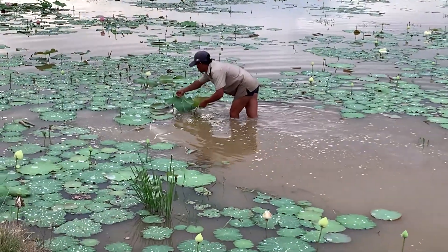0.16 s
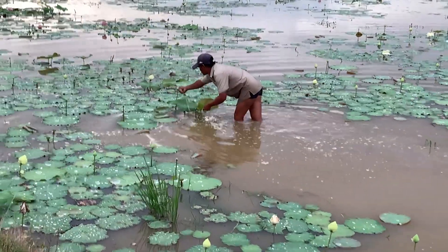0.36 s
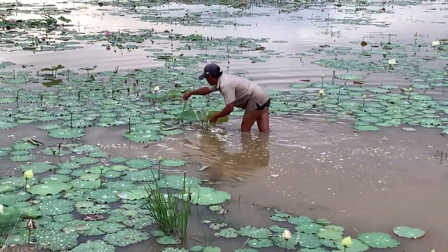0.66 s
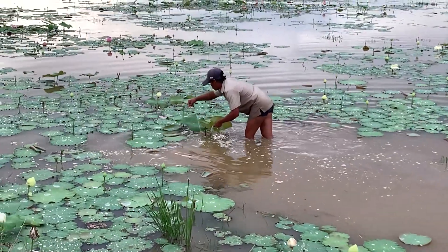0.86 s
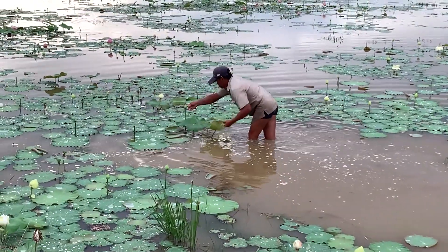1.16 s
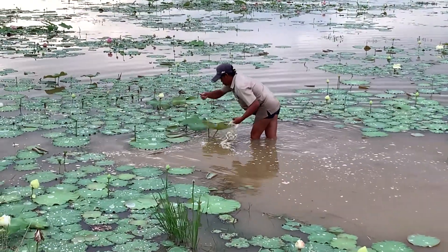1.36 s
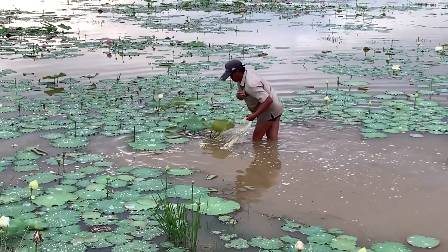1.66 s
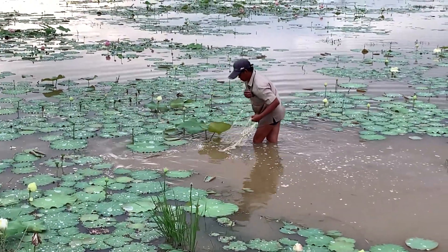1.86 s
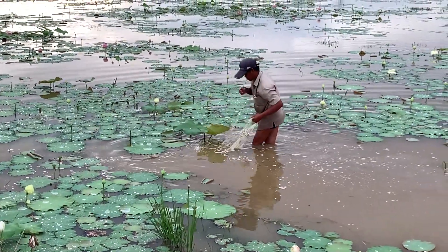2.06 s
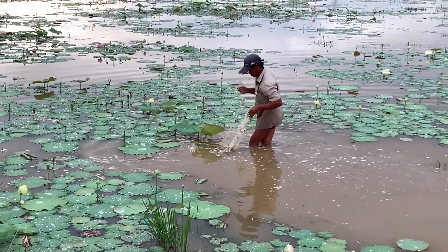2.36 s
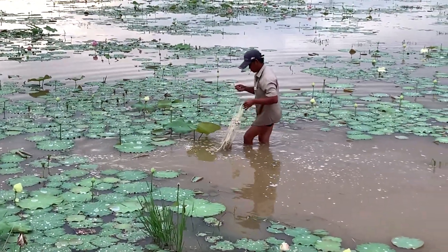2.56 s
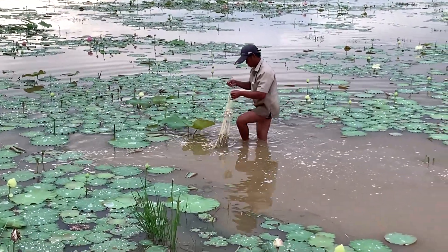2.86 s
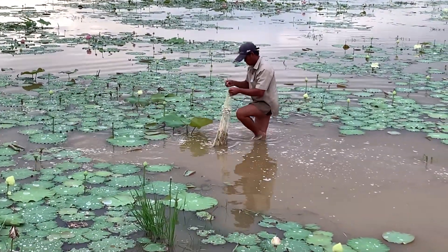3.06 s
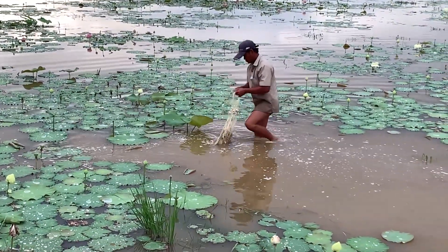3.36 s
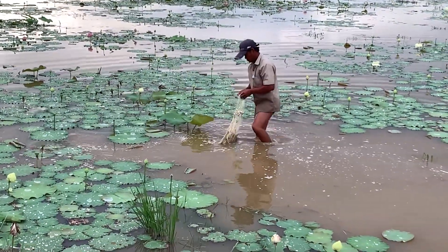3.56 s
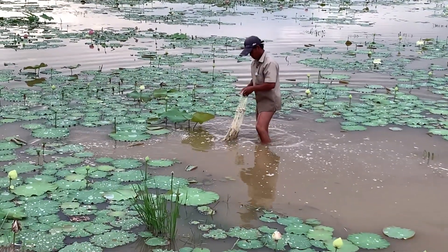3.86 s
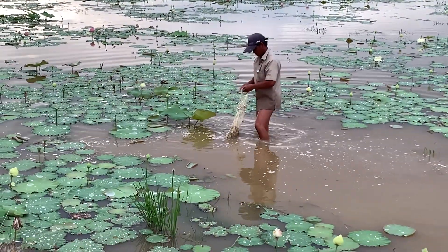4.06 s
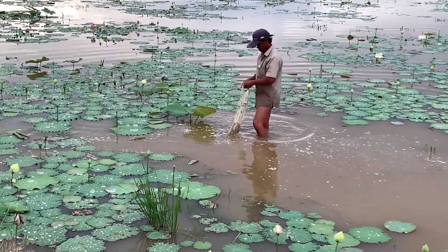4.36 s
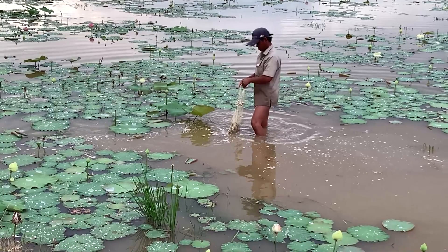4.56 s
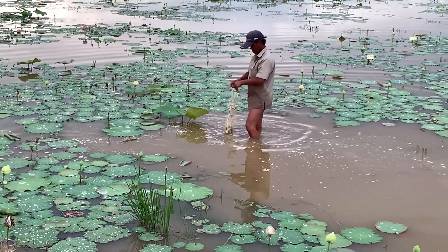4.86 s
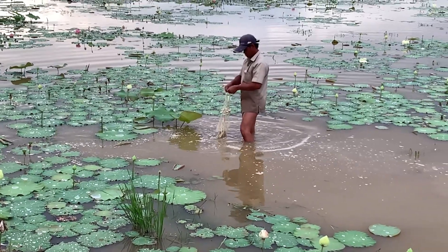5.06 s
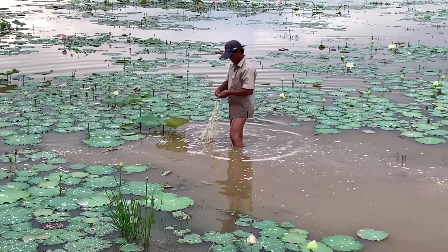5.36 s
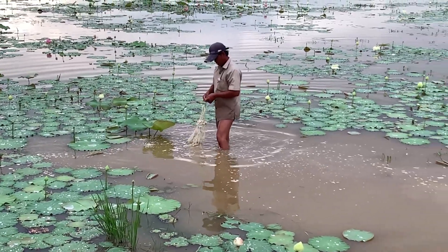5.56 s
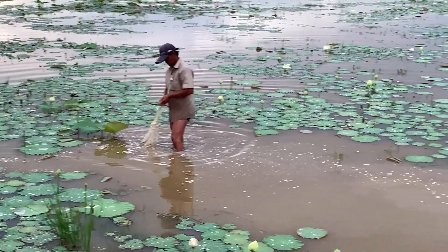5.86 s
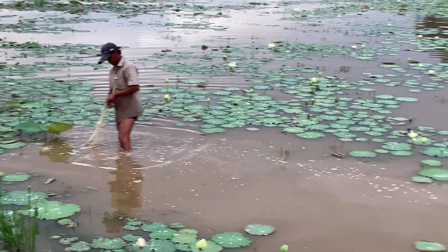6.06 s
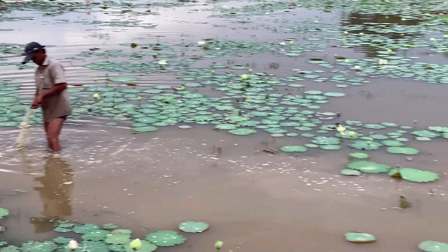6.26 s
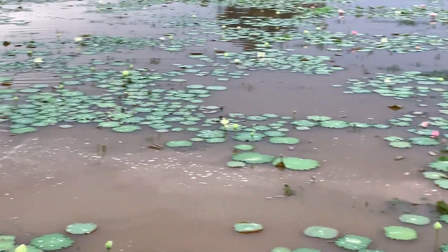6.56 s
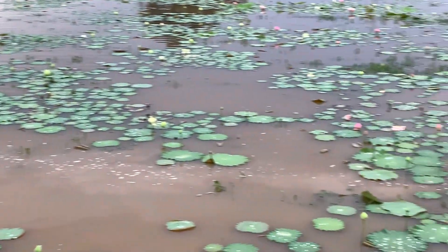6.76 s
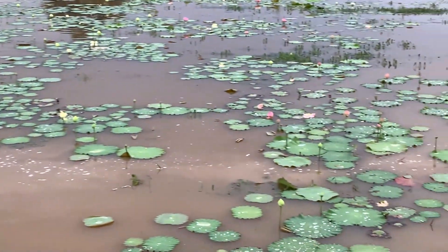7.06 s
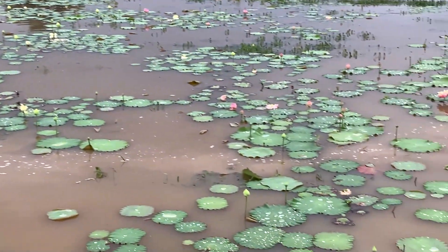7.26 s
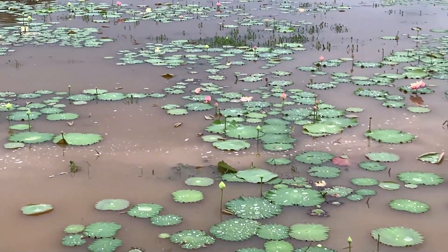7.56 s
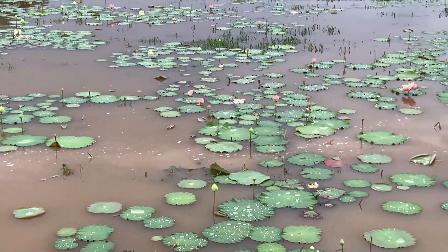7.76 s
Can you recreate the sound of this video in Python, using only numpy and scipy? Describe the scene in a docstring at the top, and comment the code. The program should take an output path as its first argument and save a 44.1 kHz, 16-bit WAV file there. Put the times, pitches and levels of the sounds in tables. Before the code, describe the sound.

Outdoors on a pond, dense nasal bird chatter runs without pause while water pours and plops softly, low air rumbles, and handling thuds knock occasionally.

```python
"""Lotus pond: a colony of birds chatters off to the left in short, buzzy, overlapping calls, with thin chips between.
Calls are pulsed harmonics through a throat resonance plus puffs of noise; chips are bent tones with overtones.
A man wades and gathers a wet net some way off: rising bubbles, splashes and a wash of coloured noise.
Noise makes the low rumble, open-air murmur and high left hiss; wavering tones make the faint far hums.
The camera is bumped a few times: decaying modes and a noise scuff."""
import sys
import numpy as np
from scipy import signal
from scipy.fft import rfft, irfft, next_fast_len
from scipy.io import wavfile
from scipy.ndimage import map_coordinates

SR = 44100
rng = np.random.default_rng(int(sys.argv[2]) if len(sys.argv) > 2 else 0)


def inscribe(sig):
    """Save sig as 16-bit PCM at rate SR to the path in sys.argv[1].

    A 1-D sig is mono; a 2-D sig holds one channel per row.
    Samples are clipped to [-1, 1] before scaling.
    """
    pcm = np.round(np.clip(np.atleast_2d(sig).T, -1, 1) * 32767)
    wavfile.write(sys.argv[1], SR, pcm.astype(np.int16))


N = 348823


def amp(db):
    """Decibels to gain."""
    return 10 ** (np.asarray(db) / 20)


def unit(x):
    """Scale to rms 1."""
    return x / np.sqrt(np.mean(x ** 2) + 1e-20)


def along(points, hz):
    """Read (frequency, value) points on a log frequency axis."""
    f, v = np.transpose(points)
    return np.interp(np.log(hz + 1e-6), np.log(f), v)


def curve(rows):
    """Interpolate (time_s, value) rows to one value per sample."""
    s, values = np.transpose(rows)
    return np.interp(np.arange(N) / SR, s, values)


def wobble(rate_hz, size=N):
    """Smooth random curve with rate_hz knots a second."""
    knots = rng.standard_normal(int(size * rate_hz / SR) + 4)
    return map_coordinates(knots, [np.arange(size) * rate_hz / SR], mode="mirror")


def filtered(x, response):
    """Multiply the spectrum of x by a (complex) response of frequency."""
    m = next_fast_len(x.shape[-1] + 4096)
    spectrum = rfft(x, m) * response(np.fft.rfftfreq(m, 1 / SR))
    return irfft(spectrum, m)[..., :x.shape[-1]]


def add(track, start_s, sound):
    """Mix a sound into the track at start_s."""
    room = track[max(0, round(start_s * SR)):][:len(sound)]
    room += sound[:len(room)]


def rush(spectrum, side_db):
    """Coloured stereo noise of rms 1; the side part sets its width."""
    mid, side = filtered(rng.standard_normal((2, N)), lambda hz: amp(along(spectrum, hz)))
    side = amp(side_db) * side
    return unit(np.array([mid + side, mid - side]))


def from_left(x, lead_ms):
    """Sound from the left reaches the left port lead_ms before the right."""
    return filtered(x, lambda hz: np.exp(np.outer([1, -1], 1j * np.pi * hz * lead_ms / 1e3)))


def arch(u, start, middle, end):
    """Parabola through three values as u goes from 0 to 1."""
    return start * (1 - u) * (1 - 2 * u) + 4 * middle * u * (1 - u) + end * u * (2 * u - 1)


def gate(t, attack_s, release_s):
    """Linear opening and closing ramps."""
    return np.clip(t / attack_s, 0, 1) * np.clip((t[-1] - t) / release_s, 0, 1)


def swell(crest_s, width_s, db):
    """Bell of power that rises and settles."""
    return amp(db) ** 2 * np.exp(-((np.arange(N) / SR - crest_s) / width_s) ** 2)


# rumble, murmur and hiss colours: hz, relative level_db_per_hz
RUMBLE_COLOUR = [(20, -49), (35, -15.5), (52, -1.5), (70, 5.5), (110, 0.5), (160, -13), (220, -20.5),
                 (400, -63.5)]
MURMUR_COLOUR = [(120, -24), (250, 6.5), (400, 5.5), (550, -1.5), (850, -4), (1200, -16), (3000, -18.5),
                 (5000, -26.5), (7000, -51), (12000, -35)]
HISS_COLOUR = [(7000, -68), (7850, -3), (8100, 23.5), (9000, 22), (9650, 16), (10200, -5.5), (12000, -14)]
# murmur and hiss levels before trim: time_s, level_db
MURMUR_LEVEL = [(0, -63), (1.7, -65), (6.2, -63.5), (6.5, -59.5), (7.91, -61.5)]
HISS_LEVEL = [(0, -75.5), (6.1, -80), (7.91, -67)]
# swells of the rumble: crest_s, half_width_s, level_db
GUSTS = [(2.7, 0.44, -46), (5.2, 0.28, -47.5), (7.2, 0.555, -46.5)]
RUMBLE_DB, RUMBLE_WANDER_DB = -43.5, 0.25  # level between gusts, slow drift


def air(murmur_trim_db=2, hiss_trim_db=4):
    """Gust-swelled low rumble, open-country murmur and shimmering high hiss on the left, all coloured noise."""
    calm_db = RUMBLE_DB + RUMBLE_WANDER_DB * wobble(3.02)
    rumble_gain = np.sqrt(amp(calm_db) ** 2 + sum(swell(*row) for row in GUSTS))
    murmur_db = curve(MURMUR_LEVEL) + murmur_trim_db + wobble(5)
    shimmer_db = 1.02 * wobble(140) + 0.91 * wobble(14)
    hiss_db = curve(HISS_LEVEL) + hiss_trim_db + shimmer_db
    # last factor: left and right gains, dB
    rumble = rumble_gain * rush(RUMBLE_COLOUR, side_db=-13.5) * amp([[.8], [-.8]])
    murmur = amp(murmur_db) * rush(MURMUR_COLOUR, side_db=-5.5) * amp([[.5], [-.5]])
    hiss = amp(hiss_db) * rush(HISS_COLOUR, side_db=-5) * amp([[2], [-17]])
    return rumble + murmur + hiss


def hum(length_s, start_hz, end_hz, waver, fading_db):
    """Far tone that swells, wavers and fades; the moving air smears its phase."""
    t = np.arange(int(length_s * SR)) / SR
    pitch_hz = np.linspace(start_hz, end_hz, len(t)) * (1 + waver * wobble(24.9, len(t)))
    smear_rad = .85 * wobble(60, len(t))
    tone = np.sin(2 * np.pi * np.cumsum(pitch_hz) / SR + smear_rad)
    tone = tone * amp(fading_db * wobble(18.1, len(t)))
    return unit(tone * np.sqrt(np.abs(np.sin(np.pi * t / t[-1]))))


# far wavering hums: start_s, length_s, level_db before trim, start_hz, end_hz
HUMS = [(1.05, 0.52, -69, 730, 721), (1.797, 2.5, -67, 672, 687), (3.1, 0.49, -69, 614, 609.6),
        (5.25, 1.27, -67.5, 738, 763), (5.9, 2.01, -68, 919, 914), (6.4, 0.634, -69, 816, 825.3),
        (7.62, 0.32, -62.5, 663.8, 610)]
# short low far hoots: start_s, length_s, level_db before trim, pitch_hz
HOOTS = [(0.071, 0.25, -61.5, 410), (2.529, 0.26, -62.5, 388), (4.699, .17, -62.5, 382),
         (6.239, 0.17, -60.5, 380), (6.83, .14, -58, 380), (7.299, 0.114, -57.5, 392)]


def hums(trim_db=-2):
    """Faint hums and short low hoots from far away, each a wavering sine."""
    out = np.zeros(N)
    for start_s, length_s, level_db, start_hz, end_hz in HUMS:
        sound = hum(length_s, start_hz, end_hz, waver=0.00803, fading_db=4)
        add(out, start_s, amp(level_db + trim_db) * sound)
    for start_s, length_s, level_db, pitch_hz in HOOTS:
        sound = hum(length_s, pitch_hz, pitch_hz, waver=0.017, fading_db=2.5)
        add(out, start_s, amp(level_db + trim_db) * sound)
    return out


# decay of the scattered tail: hz, t60_s
BANK_DECAY = [(300, 0.123), (3000, 0.098), (10000, 0.0271)]


def banks(x):
    """Banks and plants scatter a short diffuse tail: noise that decays by frequency, convolved with x."""
    hz, t, z = signal.stft(rng.standard_normal((2, SR // 3)), SR, nperseg=256)
    decay = amp(-60 * t / along(BANK_DECAY, hz)[:, None])
    tail = signal.istft(z * decay, SR, nperseg=256)[1]
    return signal.fftconvolve(x[None], tail / np.linalg.norm(tail[0]), axes=1)[:, :N]


def bubble(hz, cycles, rise=0.76):
    """An air bubble rings briefly; its pitch climbs by the share rise."""
    t = np.arange(int(cycles / hz * SR)) / SR
    u = t / t[-1]
    return np.sin(2 * np.pi * hz * t * (1 + rise * u / 2)) * amp(-40 * u) * (1 - np.exp(-t * hz))


# water falling from the net and round the legs: start_s, level_db before trims, bubble start_hz
PLOPS = [(.7, -45, 920), (1.074, -44, 910), (3.306, -46.5, 726), (3.415, -46.5, 873), (3.555, -48, 750),
         (6.436, -42, 800)]
# splash and wash colours: hz, relative level_db_per_hz
SPLASH_COLOUR = [(400, -24), (800, 11), (1600, -12.5), (3000, -17), (5000, -43), (9000, -61)]
TRICKLE_COLOUR = [(500, 10), (1000, 6), (1600, 15.5), (3300, 5), (5000, -12.5), (9000, -39)]
# stirred water: crest_s, half_width_s, level_db before trims
SWASHES = [(.24, 0.315, -55.5), (3.1, 0.6, -61), (6.6, 0.18, -54), (7.55, 0.41, -54.5)]
TRICKLE_DB = -67  # calm water, before trims


def water(drop_count=1100, drop_hz=1900, drop_db=-3, wash_db=-6.5, spatter_db=4.0,
          plop_db=-4, splash_db=-9, splash_t60_s=0.13):
    """Each plop is a bubble and a brief noise splash; small bubbles and a soft wash swell beneath."""
    trickle_db = 10 * np.log10(amp(TRICKLE_DB) ** 2 + sum(swell(*row) for row in SWASHES))
    plops, splashes, drops = np.zeros((3, N))
    t = np.arange(SR // 8) / SR
    for start_s, level_db, hz in PLOPS:
        add(plops, start_s, amp(level_db + plop_db) * bubble(hz, cycles=20))
        spatter = rng.standard_normal(len(t)) * amp(4 * wobble(300, len(t)))
        splash = unit(filtered(spatter, lambda f: amp(along(SPLASH_COLOUR, f))))
        add(splashes, start_s, amp(level_db + splash_db - 60 * t / splash_t60_s) * splash)
    for when, pitch, size in rng.random((drop_count, 3)):
        octaves = 1.6 * pitch - .8
        drop = amp(13 * size ** 3) * bubble(drop_hz * 2 ** octaves, cycles=9)
        add(drops, when * N / SR, amp(drop_db) * drop)
    wash = amp(trickle_db + wash_db + spatter_db * wobble(110)) * rush(TRICKLE_COLOUR, side_db=2.5)
    return from_left(plops + splashes + amp(trickle_db) * drops, lead_ms=0.28) + wash


# water pouring off the net: start_s, length_s, level_db
POURS = [(0.1, 0.117, -57.5), (0.402, 0.098, -59.5), (0.705, 0.099, -67), (1.008, 0.1236, -54)]
# pour colour: hz, relative level_db_per_hz
POUR_COLOUR = [(300, -22), (600, -1.5), (950, 6.5), (1300, 6.5), (1800, -0.5), (2800, 3.5), (4500, -12.5),
               (9000, -33)]


def pours(rattle_db=2.5):
    """Water pours off the net in rattling bursts: coloured noise of uneven level."""
    out = np.zeros(N)
    for start_s, length_s, level_db in POURS:
        t = np.arange(int(length_s * SR)) / SR
        spatter = rng.standard_normal(len(t)) * amp(rattle_db * wobble(256.5, len(t)))
        burst = unit(filtered(spatter, lambda hz: amp(along(POUR_COLOUR, hz))))
        add(out, start_s, amp(level_db) * burst * gate(t, attack_s=0.0116, release_s=0.018))
    return from_left(out, lead_ms=0.49)


def struck_mode(t, hz, t60_s):
    """A struck resonance: a decaying sine with a softened onset."""
    return amp(-60 * t / t60_s) * np.sin(2 * np.pi * hz * t) * (1 - np.exp(-2 * t * hz))


# dull bumps: start_s (sounds 1.9 ms later), level_db before trims, knock_hz
BUMPS = [(1.258, -37.5, 376), (1.348, -44, 428), (2.7, -38, 168), (5.843, -40.5, 260), (5.882, -45, 289),
         (7.152, -33, 364)]
# scuff colour: frequency over knock_hz, relative level_db_per_hz
SCUFF_COLOUR = [(.16, -16.5), (.36, 5), (.7, 0), (1.25, -2.5), (1.75, -18), (3.2, -61)]


def bumps(knock_db=-3, thud_db=1, scuff_db=-5, mean_thud_hz=110, knock_t60_s=0.059, thud_t60_s=0.32,
          scuff_t60_s=0.11):
    """Handling knocks the camera body: a short knock, a low thud of varying pitch and a dull noise scuff."""
    out, t = np.zeros(N), np.arange(SR // 5) / SR
    for start_s, level_db, knock_hz in BUMPS:
        thud_hz = mean_thud_hz * (1 + 0.08 * rng.standard_normal())
        knock = struck_mode(t, knock_hz, knock_t60_s) + 0.113 * struck_mode(t, 0.5 * knock_hz, knock_t60_s)
        scuff = unit(filtered(rng.standard_normal(len(t)), lambda hz: amp(along(SCUFF_COLOUR, hz / knock_hz))))
        scuff = scuff * amp(scuff_db - 60 * t / scuff_t60_s) * gate(t, attack_s=0.00096, release_s=.01)
        thud = amp(thud_db) * struck_mode(t, thud_hz, thud_t60_s)
        add(out, start_s + 0.0019, amp(level_db) * (amp(knock_db) * knock + scuff + thud))
    return out


# dry snaps: start_s, level_db before trim and filter
TICKS = [(2.622, -40), (6.087, -48)]


def ticks(trim_db=3.5, t60_s=0.0057):
    """A few tiny dry snaps: fast-decaying bright noise."""
    out, t = np.zeros(N), np.arange(SR // 50) / SR
    for start_s, level_db in TICKS:
        add(out, start_s, amp(level_db + trim_db - 60 * t / t60_s) * rng.standard_normal(len(t)))
    return filtered(out, lambda hz: amp(along([(3000, -38.5), (8000, -5.5), (11000, -8)], hz)))


# colour of overtones 3 to 7: hz, level_db
CHIP_COLOUR = [(4000, -31), (5500, 8), (7000, -13), (8400, -6), (10000, -4.5), (12000, -26.5)]


def chip(length_s, start_hz, middle_hz, end_hz, second_db, shrill_db, jitter=0.029):
    """A short rough chip: a bent tone with a ladder of overtones."""
    t = np.arange(int(length_s * SR)) / SR
    pitch_hz = arch(t / t[-1], start_hz, middle_hz, end_hz) * (1 + jitter * wobble(1415, len(t)))
    phase = 2 * np.pi * np.cumsum(pitch_hz) / SR
    k = np.arange(3, 8)[:, None]
    shrill = np.sum(amp(shrill_db + along(CHIP_COLOUR, k * pitch_hz)) * np.sin(k * phase), axis=0)
    tone = np.sin(phase) + amp(second_db) * np.sin(2 * phase) + shrill
    return unit(tone * amp(1.4 * wobble(430, len(t))) * gate(t, attack_s=0.00082, release_s=0.0044))


# thin chips: start_s, length_s, level_db, start_hz, middle_hz, end_hz, second_harmonic_db
CHIPS = [(2.376, 0.00525, -55.5, 1900, 1800, 1900, -20), (4.23, 0.0125, -65.5, 1690, 1780, 1720, -8),
         (5.413, 0.011, -56, 1460, 1570, 1690, 6.5), (5.61, 0.026, -51, 1745, 1300, 1754, 2),
         (5.639, 0.03, -63, 1690, 1710, 1600, 2), (5.718, 0.0432, -56.5, 2930, 2380, 2090, -30)]
CHIP_SHRILL_DB = -31.5
# shrill squeaks: start_s, length_s, level_db, start_hz, middle_hz, end_hz
SQUEAKS = [(0.256, 0.021, -71.5, 1938, 2150, 2040), (2.667, 0.039, -56, 1710, 1634, 1570),
           (2.778, 0.0233, -58.5, 1640, 1874, 1910), (2.798, 0.021, -61.5, 1720, 1594, 1450),
           (6.512, 0.023, -54.5, 1680, 1699, 1740)]
SQUEAK_SECOND_DB, SQUEAK_SHRILL_DB, SQUEAK_JITTER = 2, 2, 0.022


def chips():
    """Thin chips with few shrill overtones, and squeaks rich in them."""
    out = np.zeros(N)
    for start_s, length_s, level_db, *pitches_hz, second_db in CHIPS:
        add(out, start_s, amp(level_db) * chip(length_s, *pitches_hz, second_db, CHIP_SHRILL_DB))
    for start_s, length_s, level_db, *pitches_hz in SQUEAKS:
        sound = chip(length_s, *pitches_hz, SQUEAK_SECOND_DB, SQUEAK_SHRILL_DB, SQUEAK_JITTER)
        add(out, start_s, amp(level_db) * sound)
    return out


def call(length_s, pitches_hz, throat, throat_hz, onset_db, end_db, jitter, rasp_db, shimmer, crest=0.517,
         flutter_db=0.15, body_db=0, waver=0.006, sharpness=5, follow=0.99, scoop=0, settle_s=0.00972,
         quaver=0, quaver_hz=27, hoarsens_db=0, release_s=0.01043):
    """One buzzy call: the syrinx pulses at a bent pitch and rings a throat resonance that bends with it."""
    t = np.arange(int((length_s + 0.0055) * SR)) / SR
    u, size = t / t[-1], len(t)
    bend_hz = arch(u, *pitches_hz)
    mean_hz = bend_hz.mean()
    # the bird tunes its throat halfway to the nearest harmonic
    tuned_hz = mean_hz * round(throat_hz / mean_hz)
    resonance_hz = (throat_hz + tuned_hz) / 2 * (bend_hz / mean_hz) ** follow
    # sharp start that settles, and quaver
    ornament = scoop * np.exp(-t / settle_s) + quaver * np.cos(2 * np.pi * quaver_hz * t)
    pitch_hz = bend_hz * (1 + ornament + waver * wobble(61.0, size) + jitter * wobble(404.9, size))
    phase = 2 * np.pi * np.cumsum(pitch_hz) / SR
    k = np.arange(1, 27)[:, None]
    ratio = k * pitch_hz / (resonance_hz * (1 + 0.36 * ornament))
    # each pulse rings on, so harmonic phase turns through the resonance
    turn = np.arctan(sharpness * (ratio - 1 / ratio))
    partials = amp(along(throat, ratio)) * np.sin(k * phase - turn)
    # random shifting colour per call
    colour = amp([1.4 * rng.standard_normal() + 2 * wobble(55, size) for _ in k])
    body = amp(body_db * np.clip(4 * (1 - ratio), 0, 1))  # weight below the resonance
    voice = unit(np.sum(colour * body * partials, axis=0))
    voice = voice * (1 + shimmer * wobble(500, size))
    # air rasps through in one puff per pulse
    puffs = rng.standard_normal(size) * (1 + np.cos(phase))
    rasp = unit(filtered(puffs, lambda hz: amp(along(throat, hz / throat_hz))))
    rasp = rasp * amp(hoarsens_db * (u - .5))  # above 0 breaks up, below 0 clears
    effort_db = np.interp(u, [0, crest, 1], [onset_db - 7.5, 0, end_db]) + flutter_db * wobble(134, size)
    sound = (voice + amp(rasp_db) * rasp) * amp(effort_db)
    return unit(sound * gate(t, attack_s=.0011, release_s=release_s))


# throat of the colony and of the hoarse near calls: frequency over resonance, level_db
RASP_THROAT = [(.15, -48), (.3, -15.5), (.41, -2), (.55, -4), (.68, -2), (.8, -1.5), (1, 5.5), (1.12, -1.5),
               (1.27, -5.5), (1.5, -21), (1.9, -25.5), (2.6, -31.5), (3.6, -42)]
COLONY_DB, COLONY_SPREAD_DB, COLONY_HZ = -74, 6, 492  # faintest call, range of levels, central pitch


def colony(count=26):
    """The rest of the colony, far off: calls of random pitch and level, one in each equal time slot."""
    out = np.zeros(N)
    for i, (when, size, high, throat) in enumerate(rng.random((count, 4))):
        hz = COLONY_HZ * (.88 + .24 * high)
        voice = call(.06, (hz, hz, .9 * hz), RASP_THROAT, 2900 + 700 * throat, onset_db=2.5, end_db=-3,
                     jitter=.012, rasp_db=-13.5, shimmer=.15)
        add(out, (i + when) * N / SR / count, amp(COLONY_DB + COLONY_SPREAD_DB * size) * voice)
    return out


# soft far answers: start_s, length_s (call adds 5.5 ms), level_db, mid-call pitch_hz
ANSWERS = [(3.059, 0.049, -60.5, 457.3), (3.249, 0.058, -61, 466), (3.475, 0.0455, -62.5, 470),
           (3.714, 0.038, -67, 453), (4.05, 0.048, -61.5, 464), (4.866, 0.0516, -70.5, 520),
           (5.3, 0.047, -73, 524), (7.3, 0.059, -72, 482.4), (7.839, 0.047, -58.5, 462)]
# frequency over resonance, level_db
ANSWER_THROAT = [(.15, -40), (.3, -29), (.55, -9.5), (.8, -13), (1, 3.5), (1.15, -10), (1.4, -17), (3, -38)]
ANSWER_START, ANSWER_END = 0.95, 0.93  # pitch over mid-call pitch
ANSWER_HARMONIC = 7  # throat resonance over mid-call pitch


def far_birds():
    """Fainter birds answer softly through a narrow throat resonance."""
    out = np.zeros(N)
    for start_s, length_s, level_db, hz in ANSWERS:
        voice = call(length_s, (ANSWER_START * hz, hz, ANSWER_END * hz), ANSWER_THROAT, ANSWER_HARMONIC * hz,
                     onset_db=8.5, end_db=3.5, jitter=0.013, rasp_db=-14, shimmer=0.14)
        add(out, start_s, amp(level_db) * voice)
    return out


def voice_track(rows, throat, **style):
    """Place one voice's calls, each with its own pitch arch and throat resonance."""
    out = np.zeros(N)
    for start_s, length_s, level_db, *pitches_hz, throat_hz in rows:
        add(out, start_s, amp(level_db) * call(length_s, pitches_hz, throat, throat_hz, **style))
    return out


# low falling calls: start_s, length_s (call adds 5.5 ms), level_db, start_hz, middle_hz, end_hz, throat_hz
YAPS = [(0.643, 0.054, -53.5, 476.5, 463, 443.7, 3545), (1.047, .058, -48.5, 431.4, 452, 428, 3490),
        (1.294, 0.058, -48, 454.5, 440, 405, 3390), (1.769, 0.054, -48.5, 457.5, 428.6, 395, 3210),
        (1.999, 0.0605, -48, 457, 419.5, 375, 3148), (2.23, 0.063, -50, 450.3, 419, 392, 3156),
        (2.474, 0.064, -50.5, 448, 438.5, 390, 3236), (2.704, 0.072, -49.5, 451.1, 431, 402.2, 3170),
        (2.952, 0.06, -49.5, 434, 417.3, 384, 3116), (3.189, 0.052, -48.5, 443, 418.9, 400, 3000),
        (3.418, 0.063, -48.5, 456.6, 430.5, 399.3, 3000), (3.649, 0.0648, -48.5, 450.4, 428.4, 413, 2930),
        (3.886, 0.056, -48, 445, 430, 393, 2950)]
# frequency over resonance, level_db
YAP_THROAT = [(.15, -51), (.3, -23), (.42, -12.5), (.56, -15), (.72, -12), (.87, -2), (1, 5.5), (1.13, -6),
              (1.28, -13), (1.45, -19.5), (1.9, -23), (2.6, -36.5), (3.6, -35)]


def yaps():
    """Low, hard calls that end lower; their rasp clears as they go."""
    return voice_track(YAPS, YAP_THROAT, onset_db=6, end_db=-2.0, jitter=0.011, rasp_db=-11, shimmer=0.12,
                       quaver=-.022, quaver_hz=20.36, hoarsens_db=-13, release_s=.012)


# two-tone calls: start_s, length_s (call adds 5.5 ms), level_db, pitch_hz, below_resonance_db
YIPS = [(0.924, 0.049, -52.5, 447, -8), (1.194, 0.0664, -54, 438.5, -1), (1.5334, 0.056, -46, 431, -4.5),
        (1.808, 0.054, -53.5, 438.5, 0), (2.091, 0.057, -54, 416, -0.5), (2.351, 0.056, -55, 438, 0),
        (2.606, 0.053, -55, 435, -0.5), (2.848, 0.059, -53, 428, -0.5), (3.099, 0.0617, -53.5, 434.1, -5),
        (3.345, 0.059, -54.5, 437.2, 0), (3.598, 0.072, -54, 423, 0), (3.842, 0.057, -52.5, 420, -2.5),
        (4.095, 0.061, -55.5, 422.5, 0.5), (4.346, 0.068, -55, 409, 1.5), (5.691, 0.0417, -52.5, 464, -3),
        (5.822, 0.0323, -55, 474.4, -8), (5.941, 0.0555, -54.5, 449, -7), (6.377, 0.067, -57.5, 455, -2),
        (6.549, 0.054, -54.5, 446, -2), (6.686, 0.047, -54.5, 450, -2.5), (6.836, 0.06, -55.5, 448, -1.5),
        (7.095, 0.064, -54.5, 444.1, -2.5), (7.364, 0.0652, -56, 440, -1), (7.5, 0.058, -56.5, 434, 5.5),
        (7.658, 0.068, -57.5, 438.9, -1)]
# frequency over resonance, level_db
YIP_THROAT = [(.15, -60), (.36, -8), (.49, -5.5), (.62, -1), (.75, 2.5), (.86, 2.5), (1, 6.5), (1.11, 1),
              (1.25, -6.5), (1.5, -23.5), (1.8, -20), (2.4, -33), (3.4, -38)]
YIP_THROAT_HZ, YIP_SAG = 3440, 0.95  # sag: last pitch over main pitch
YIP_SCOOP, YIP_SCOOP_FADE_PER_S = .18, 0.01187  # sharp start as a share of pitch; shrinks over the bout


def yips():
    """Two-tone calls that burst out sharp, settle, quaver and sag."""
    out = np.zeros(N)
    for start_s, length_s, level_db, hz, body_db in YIPS:
        scoop = YIP_SCOOP - YIP_SCOOP_FADE_PER_S * start_s
        voice = call(length_s, (hz, hz, YIP_SAG * hz), YIP_THROAT, YIP_THROAT_HZ, onset_db=6.5, end_db=-1,
                     jitter=0.0052, rasp_db=-12, shimmer=0.077, body_db=body_db, scoop=scoop,
                     quaver=0.0215, quaver_hz=26.7)
        add(out, start_s, amp(level_db) * voice)
    return out


# high calls: start_s, length_s (call adds 5.5 ms), level_db, start_hz, middle_hz, end_hz, throat_hz
SLURS = [(0.792, 0.052, -53, 494, 540, 472, 3700), (0.973, 0.0473, -52, 544.7, 507.5, 458, 3555),
         (1.236, 0.059, -53.5, 529, 506, 452.5, 3380), (1.443, 0.063, -46, 510.5, 567.4, 472.8, 3700),
         (1.692, 0.0658, -53, 502, 556, 499.3, 3600), (1.929, 0.069, -53.5, 594, 547, 487, 3670),
         (2.173, 0.072, -54, 600, 559.7, 475, 3592), (2.421, 0.066, -52.5, 615, 532, 503, 4045),
         (2.641, 0.0583, -53, 495, 521.6, 468.7, 3700), (2.889, 0.0637, -53, 539, 517, 473.2, 3849),
         (3.128, 0.063, -53.5, 541, 514, 471, 3790), (3.378, 0.059, -51, 541.7, 522, 462, 3640),
         (3.63, 0.0695, -53.5, 508, 500, 452.6, 3800), (3.924, 0.0638, -55.5, 553, 567.6, 485, 3880)]
# frequency over resonance, level_db
SLUR_THROAT = [(.15, -48), (.29, -23.5), (.43, -6), (.57, -10.5), (.71, -5), (.86, 2), (1, 5.5), (1.14, -6),
               (1.29, -15.5), (1.7, -17), (2.3, -38.5), (3.2, -37.5)]


def slurs():
    """High calls that curve down to a lower end, growing hoarser."""
    return voice_track(SLURS, SLUR_THROAT, onset_db=-0.5, end_db=-2, jitter=0.00866, rasp_db=-7.5,
                       shimmer=0.096, hoarsens_db=15, release_s=0.012)


# bright calls: start_s, length_s (call adds 5.5 ms), level_db, start_hz, middle_hz, end_hz, throat_hz
ARCHES = [(0.08, 0.0964, -58, 450, 481, 411.2, 4230), (0.294, 0.087, -60, 460, 498, 415, 3950),
          (4.119, 0.055, -52, 433.5, 453, 430, 4200), (4.386, 0.074, -49.5, 444, 482, 417, 4220),
          (4.648, 0.08, -49, 453, 488, 415.3, 4240), (4.912, 0.087, -48.5, 455.4, 473.3, 419, 3960),
          (5.179, 0.083, -49.5, 454.4, 468.6, 394.3, 3910), (5.445, 0.06, -49.5, 496, 488, 431, 4030),
          (6.195, 0.094, -48.5, 469.6, 494, 440.1, 3650), (6.456, 0.093, -51.5, 464.5, 500.5, 445.9, 3650)]
# frequency over resonance, level_db
ARCH_THROAT = [(.15, -38.5), (.3, -30), (.36, -4.5), (.47, -8.5), (.6, -4.5), (.75, -3.5), (.88, 1), (1, 8),
               (1.1, -1), (1.22, -12), (1.5, -18.5), (1.9, -24.5), (3, -42.5)]


def arches():
    """Bright calls that mostly rise, quaver and fall back."""
    return voice_track(ARCHES, ARCH_THROAT, onset_db=-1, end_db=-5, jitter=0.013, rasp_db=-8.0,
                       shimmer=0.12, quaver=0.012, quaver_hz=45.51, release_s=0.016)


# hoarse calls: start_s, length_s (call adds 5.5 ms), level_db, start_hz, middle_hz, end_hz, throat_hz
RASPS = [(0.727, 0.035, -57, 484, 527.8, 463, 3500), (5.489, 0.038, -52, 507, 489.2, 426.3, 3220),
         (5.733, 0.053, -54.5, 505.4, 511, 480, 3500), (5.973, 0.0665, -51.5, 503.6, 495.7, 483, 3560),
         (6.119, 0.061, -57, 478, 499, 457.6, 3530), (6.712, 0.056, -53, 497.7, 495.5, 461, 3500),
         (6.962, 0.054, -51.5, 493.5, 511.5, 462, 3530), (7.227, 0.059, -51, 490, 505, 412, 3320),
         (7.538, 0.055, -54, 471, 490, 462, 3470), (7.781, 0.072, -50, 468.6, 491, 437, 3270)]


def rasps():
    """Broad, hoarse calls with strong puffs and uneven pulses."""
    return voice_track(RASPS, RASP_THROAT, onset_db=1.0, end_db=-0.5, jitter=0.012, rasp_db=-4, shimmer=0.22)


def near_birds():
    """Near birds call in turn and across each other in five voices."""
    return yaps() + yips() + slurs() + arches() + rasps()


# port colours: hz, gain_db
LEFT_PORT = [(1200, 7), (1450, 5), (1750, 10), (2100, 1.5), (2500, 4.5), (3050, 7.5), (3500, 5.5),
             (4000, -1), (5200, -0.5), (6200, 0.5), (7700, -2), (8000, 17), (9000, 17), (10000, 2),
             (12000, -6)]
RIGHT_PORT = [(1200, 6), (1500, 7.5), (2100, 3.5), (2500, 5), (3050, 9.5), (3500, 2), (4000, 1), (5200, -5),
              (6200, 2.5), (7400, -9.5), (8200, 4), (12000, -14.5)]
# resonances at which the left port lags: centre_hz, width_hz
PORT_CAVITY = [(1900, 303), (5650, 39), (6750, 82)]


def ports(hz):
    """Each microphone port has its own colour; the left one turns the phase at its resonances."""
    lag = sum(2 * np.arctan2(hz * width, centre ** 2 - hz ** 2) for centre, width in PORT_CAVITY)
    left = amp(along(LEFT_PORT, hz)) * np.exp(-1j * lag)
    return np.array([left, amp(along(RIGHT_PORT, hz))])


def scene(lead_ms=0.4836, near_echo_db=-14, far_echo_db=-5):
    """Birds lead on the left and scatter off the banks; the other layers bypass the port colours."""
    near = near_birds() + chips() + ticks()
    far = far_birds() + colony()
    echo = banks(amp(near_echo_db) * near + amp(far_echo_db) * far)
    birds = filtered(from_left(near + far, lead_ms) + echo, ports)
    return air() + from_left(hums(), lead_ms=0.18) + water() + pours() + bumps() + birds


TOP_HZ = 12300


def record(dry):
    """The camera keeps nothing above its band limit."""
    return filtered(dry, lambda hz: hz < TOP_HZ)


dry = scene()
out = record(dry)
inscribe(out)
```